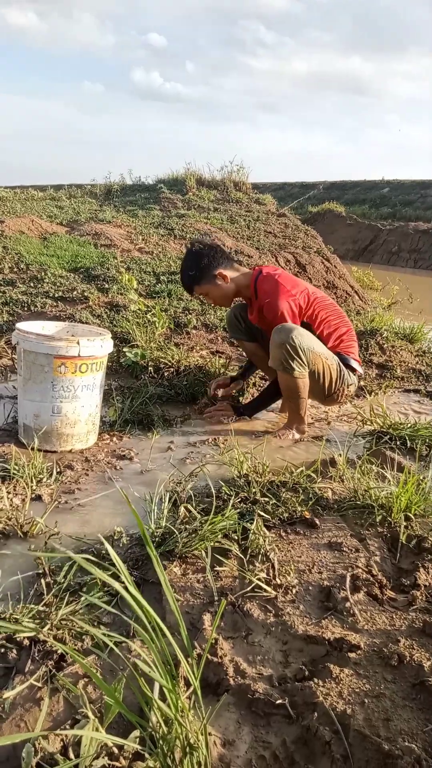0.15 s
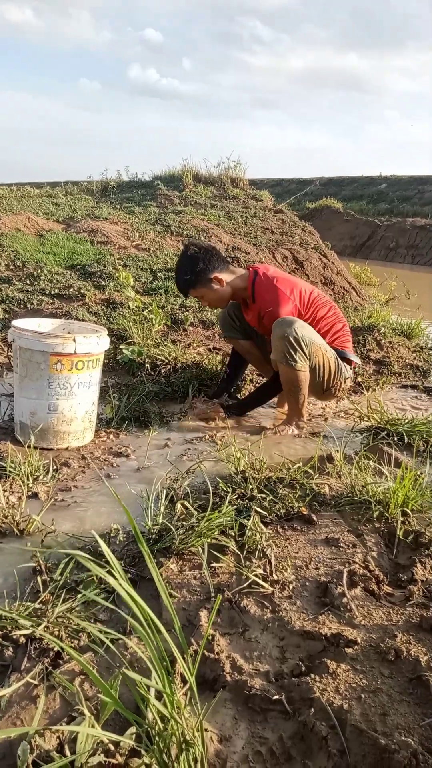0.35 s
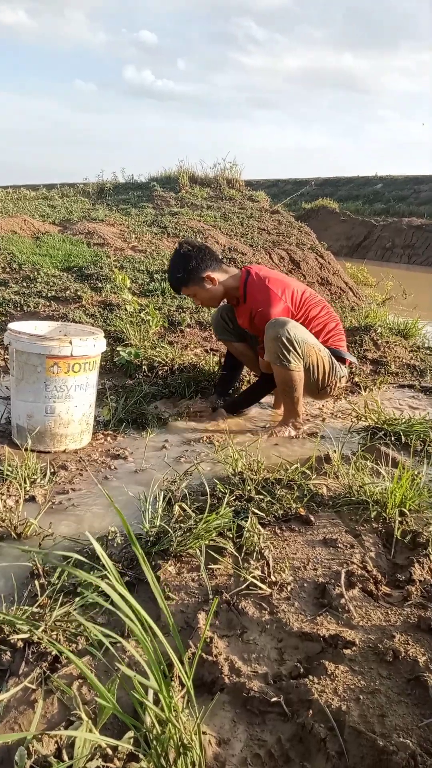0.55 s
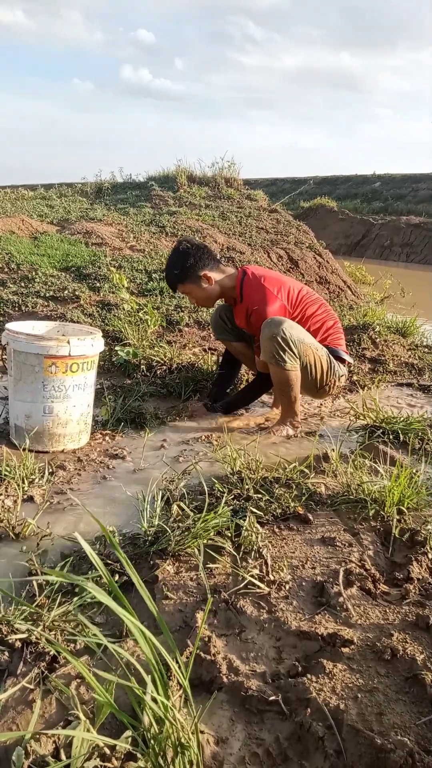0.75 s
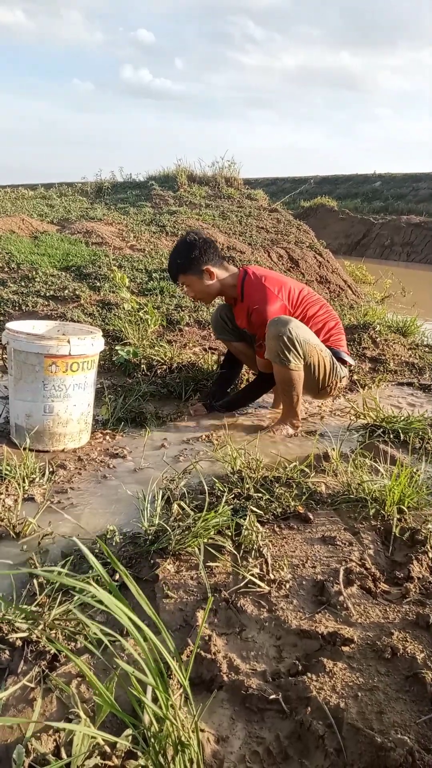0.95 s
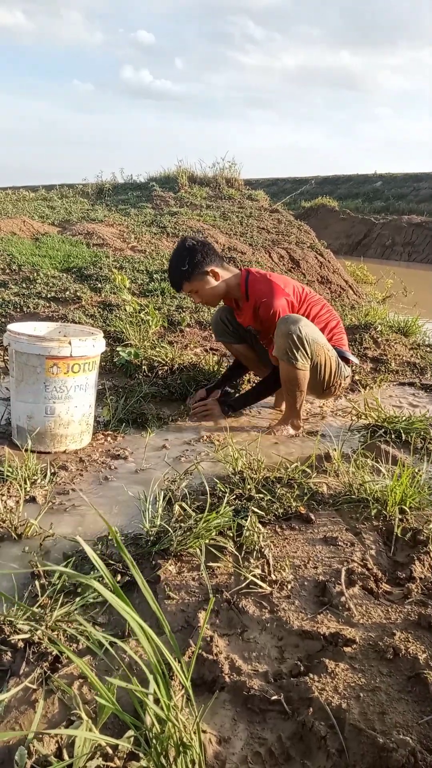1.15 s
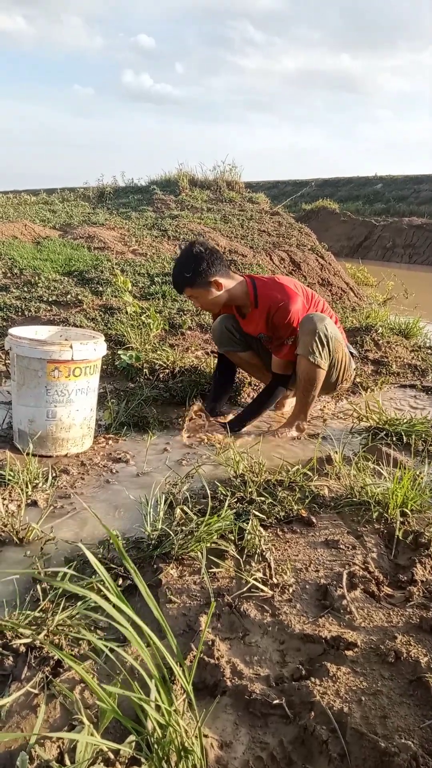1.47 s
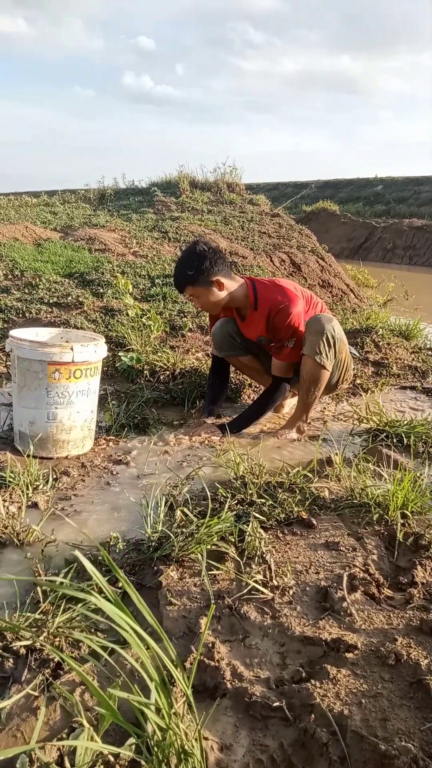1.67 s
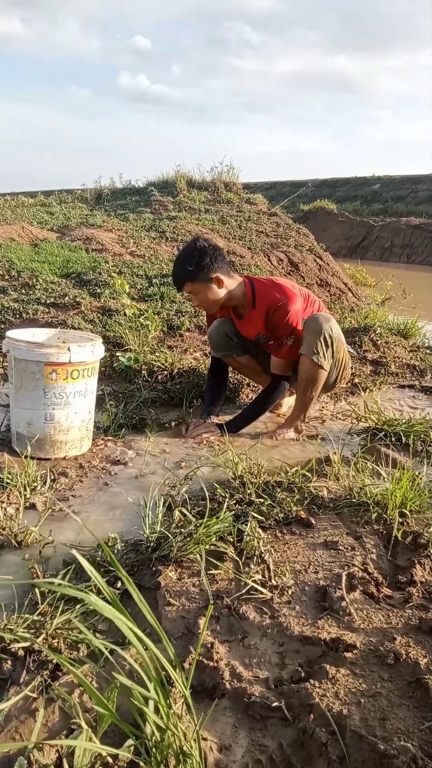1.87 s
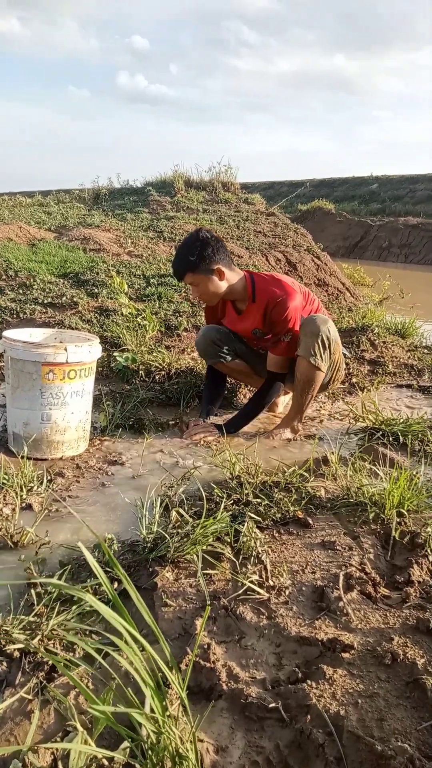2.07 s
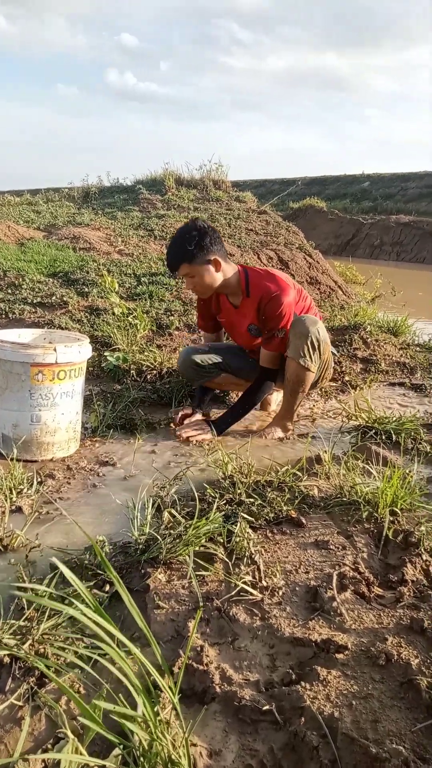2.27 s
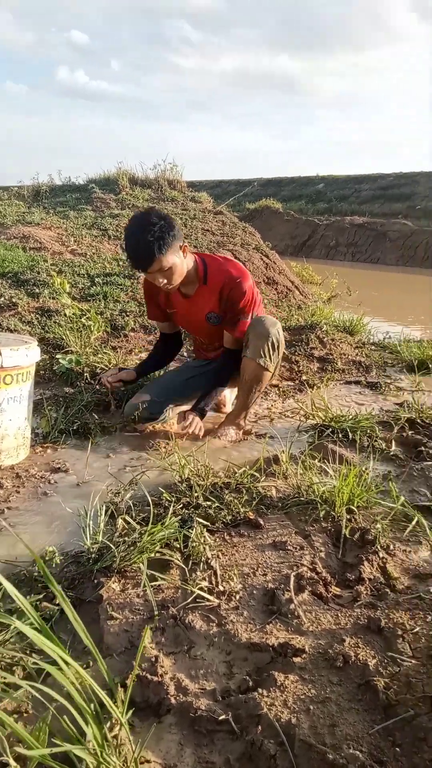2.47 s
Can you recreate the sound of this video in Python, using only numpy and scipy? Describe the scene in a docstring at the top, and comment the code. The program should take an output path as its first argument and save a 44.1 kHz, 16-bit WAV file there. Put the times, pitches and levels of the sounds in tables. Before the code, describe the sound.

Shallow water sloshes and bubbles as hands stir it outdoors, giving a few sharp drips and little splashes. A gust buffets the microphone with low, uneven thumps, builds, then fades as the water splashes again.

```python
"""In an open field, hands work through a shallow muddy puddle a few metres from a phone.
The stirred water fizzes as thousands of tiny air bubbles ring. Bigger bubbles plip one by one,
and handfuls of water splash down in short bursts of spray. A gust of wind thumps and rumbles
on the microphone opening, then dies away near the end."""
import sys
import numpy as np
from scipy import signal
from scipy.fft import rfft, irfft
from scipy.io import wavfile

SR = 44100
rng = np.random.default_rng(int(sys.argv[2]) if len(sys.argv) > 2 else 0)


def transcribe(u):
    """Save the signal u as a 16-bit wav file named by the first command-line argument.

    u: samples, shape (n,) or (channels, n), limited to [-1, 1]; the rate is SR.
    q: integer samples, one column per channel.
    """
    v = np.clip(np.atleast_2d(u).T, -1, 1)
    q = np.round(v * 32767).astype(np.int16)
    wavfile.write(sys.argv[1], SR, q)


N = 114660  # 2.6 seconds

# How hard the hands stir the water: time_s, level_db
STIR_LEVELS = [(0, -43), (.08, -47), (.15, -44.5), (.42, -44.5), (.68, -45), (.94, -44.5), (1.02, -48),
               (1.1, -43), (1.17, -49), (1.22, -44.5), (1.38, -46), (1.5, -43), (1.76, -46.5), (2.0, -47),
               (2.1, -53.5), (2.16, -50), (2.3, -52.5), (2.42, -47), (2.52, -41), (2.6, -44)]
# The tone of the fizzing water: pitch_hz, relative_db
FIZZ_TONE = [(200, -24), (450, 2.5), (800, -6), (1300, -11), (1700, -4), (2300, -6), (3100, 0),
             (3900, -5.5), (4600, -19), (6000, -24), (8000, -22), (9500, -17), (12500, -28.5),
             (15500, -29.5)]
# Single bigger bubbles: start_s, pitch_hz, level_db, ring_s (time to fade by 60 dB)
SINGLE_BUBBLES = [(.063, 832, -33, 0.034), (.133, 720, -33, 0.021), (.142, 2900, -27.5, .018),
                  (0.224, 1058, -33.5, 0.063), (0.335, 2920, -26, .025), (0.3475, 3170, -29, 0.021),
                  (0.35, 1610, -21, 0.0074), (0.3546, 3033, -1, 0.011), (0.3572, 2845, -20.5, 0.019),
                  (.416, 3140, -32, 0.03), (.436, 557, -37.5, 0.055), (0.4396, 1550, -31, 0.022),
                  (0.5565, 3030, -23, 0.012), (0.8113, 2770, -30, 0.016), (.9023, 3180, -34, 0.0096),
                  (0.9197, 2760, -21, 0.012), (.942, 3340, -34, .02), (1.084, 552, -32.5, 0.019),
                  (1.212, 3190, -34, 0.046), (1.4233, 3080, -29, 0.017), (1.462, 2300, -21, 0.0047),
                  (1.476, 4100, -33, .03), (1.483, 876, -39, 0.074), (1.646, 493, -24.5, .08),
                  (2.217, 3060, -37.5, 0.032), (2.497, 1076, -34, 0.039), (2.5083, 2210, -25.5, 0.026),
                  (2.522, 477, -34, 0.039), (2.5631, 2880, -28, 0.013), (2.565, 900, -26.5, 0.016),
                  (2.572, 523, -29, 0.012), (2.581, 2070, -27, 0.012)]
# Water slapping down: peak_s, level_db, rise_s, fade_s, treble_tilt_db_per_octave
SPLASH_HITS = [(0.099, -48, 0.0021, 0.0099, 5), (.268, -43.5, 0.011, 0.0081, 1),
               (.340, -39, .006, 0.0069, -4), (0.356, -48, .0006, 0.0018, 1),
               (0.36, -30.5, 0.006, 0.0024, 6.5), (0.527, -42, 0.005, 0.0038, 1),
               (0.558, -38, 0.00071, 0.0018, -5), (.810, -38, .001, 0.0022, -7),
               (0.841, -36.5, 0.0015, 0.0019, 20), (0.922, -40.5, .001, .008, -10),
               (1.221, -41.5, 0.0013, 0.0017, 5), (1.4408, -31.5, 0.003, 0.0041, 0.5),
               (1.4443, -17, 0.00057, 0.0016, 0.5), (1.462, -40, 0.019, 0.02, -3.5),
               (1.504, -43, 0.00089, .002, 12), (1.575, -41.5, 0.0015, 0.0028, 5),
               (1.682, -42.5, 0.0015, 0.0046, 10), (2.501, -38.5, 0.0026, 0.0036, 8),
               (2.510, -44, .001, 0.0034, 3), (2.520, -48, 0.043, 0.033, 7), (2.547, -49, .001, 0.0036, -6),
               (2.564, -37.5, .0006, 0.0044, -6.5), (2.582, -37, .001, 0.0035, -2)]
# The tone of the spray, before each splash tilts it: pitch_hz, relative_db
SPRAY_TONE = [(300, -26), (1250, -21), (2000, -3), (3200, 5.5), (5400, -2.5), (7000, -7), (9500, -8.5),
              (12000, -15.5), (15500, -21)]
# The strength of the churning air between wind thumps: time_s, level_db
GUST_LEVELS = [(0, -59.5), (.17, -45.5), (.26, -34.5), (.44, -32.5), (.472, -52), (.50, -26), (.66, -29.5),
               (.82, -29.5), (1.02, -28), (1.2, -24), (1.62, -26), (1.9, -27.5), (2.08, -23), (2.2, -41),
               (2.32, -39), (2.41, -47), (2.6, -54)]
# The tone of that churning air: pitch_hz, relative_db
GUST_TONE = [(25, -11), (40, -4.5), (70, 0), (120, -1.5), (200, -9), (280, -17), (400, -29), (600, -56.5),
             (1200, -83)]
# Swirls of air thumping the microphone: peak_s, rumble_db, half_width_s, rough_db
WIND_THUMPS = [(0.212, -21, 0.0087, -69), (0.236, -35, 0.0076, -61), (0.264, -37, .010, -67),
               (0.311, -24.5, 0.0047, -57), (0.407, -16, 0.0073, -55), (0.439, -36, 0.0051, -60),
               (.536, -18.5, 0.008, -34.5), (0.548, -13, 0.0017, -39), (.572, -25, 0.0071, -49),
               (0.629, -14.5, 0.0058, -34), (.696, -12, 0.0062, -28.5), (0.715, -14.5, 0.0086, -35),
               (.765, -24, 0.0067, -37), (0.791, -25, .008, -50), (0.843, -21.5, 0.0049, -35),
               (.872, -20.5, 0.012, -32.5), (0.9, -15, 0.0052, -32), (0.936, -26, 0.0067, -45),
               (.991, -22.5, 0.0069, -47), (1.035, -35, .010, -60), (1.071, -20.5, 0.015, -33.5),
               (1.131, -14, 0.0079, -21.5), (1.168, -18.5, 0.011, -30.5), (1.227, -13.5, 0.0075, -26.5),
               (1.252, -24, 0.014, -54), (1.354, -18.5, 0.0036, -31), (1.376, -28, 0.014, -40),
               (1.396, -21.5, 0.013, -40), (1.471, -22, .007, -66), (1.508, -20, .012, -58),
               (1.56, -17.5, 0.016, -33), (1.637, -20.5, 0.005, -49), (1.679, -21.5, 0.0098, -32),
               (1.712, -13.5, 0.0075, -20), (1.729, -13.5, 0.0056, -20.5), (1.761, -16.5, 0.005, -38),
               (1.778, -15, 0.006, -31), (1.847, -10.5, 0.015, -28.5), (1.888, -20, 0.0058, -29.5),
               (1.914, -13.5, 0.0081, -32), (1.954, -14, 0.0052, -30), (2.017, -16, 0.0097, -18.5),
               (2.043, -12, 0.0086, -15.5), (2.072, -7.5, 0.0064, -12), (2.089, -19.5, 0.011, -28),
               (2.109, -18.5, 0.0063, -19.5), (2.128, -21.5, 0.015, -36), (2.182, -25.5, 0.02, -42.5),
               (2.269, -28, 0.013, -55), (2.355, -37, 0.0056, -58), (2.459, -34.5, 0.0074, -72),
               (2.594, -42, 0.0046, -62)]
# The deep part of a thump: pitch_hz, relative_db
RUMBLE_TONE = [(25, -3), (40, -27.5), (70, -3.5), (120, 1), (200, -1.5), (280, -9), (400, -21.5),
               (600, -53.5), (1200, -87)]
# The rough, higher part of a thump: pitch_hz, relative_db
ROUGH_TONE = [(120, -40), (250, -1), (380, 1.5), (520, -5.5), (700, -17), (950, -28), (1400, -56),
              (3000, -61)]

TOP_HZ = 15450  # the phone cuts the treble above this


def undb(db):
    """Turn decibels into a number to multiply by."""
    return 10 ** (np.asarray(db) / 20)


def level_curve(rows):
    """Join (time_s, level_db) points into a smooth volume control."""
    return undb(np.interp(np.arange(N) / SR, *np.array(rows).T))


def colour(sound, tone):
    """Filter a sound by (pitch_hz, relative_db) points, then set its average (rms) level to 1."""
    hz, db = np.array(tone).T
    all_hz = np.maximum(np.fft.rfftfreq(len(sound), 1 / SR), 1)
    gains = undb(np.interp(np.log(all_hz), np.log(hz), db))
    filtered = irfft(rfft(sound) * gains, len(sound))
    return filtered / np.sqrt(np.mean(filtered ** 2) + 1e-18)


def add(out, start_s, sound):
    """Mix a sound into out, dropping whatever falls outside the scene."""
    start = int(round(start_s * SR))
    first, end = max(start, 0), min(start + len(sound), N)
    if end > first:
        out[first:end] += sound[first - start:end - start]


def burst(noise, shape):
    """Fade noise in and out along a shape, with a level of about 1 at the top."""
    shaped = noise * shape
    return shaped * np.sqrt(np.sum(shape ** 2) / np.sum(shaped ** 2))


def flutter(per_s, length):
    """A short random wobble that glides to a new value per_s times a second."""
    steps = rng.standard_normal(size=48)
    return np.interp(np.arange(length) * per_s / SR, np.arange(len(steps)), steps)


def bubble(hz, ring_s, swell_cycles=2.9, pitch_rise=0.09):
    """A bubble pinches off, rings and rises a little in pitch. Take .imag to get the sound."""
    swell_s = swell_cycles / hz
    t = np.arange(int((ring_s + swell_s) * SR)) / SR
    swell = np.sin(np.pi / 2 * np.minimum(t / swell_s, 1)) ** 2
    fade = undb(-60 * np.maximum(t - swell_s / 2, 0) / ring_s)
    cycles = hz * (t + pitch_rise * t ** 2 / (2 * ring_s))
    return swell * fade * np.exp(2j * np.pi * cycles)


def tiny_bubbles(per_s=2200, lowest_hz=350, spread_db=3.3):
    """Tiny bubbles ring at random, most faint and a few loud; smaller ones are higher and shorter."""
    out = np.zeros(N)
    pitches = np.linspace(lowest_hz, TOP_HZ, 400)
    ring_times = .0065 * np.sqrt(3000 / pitches)  # 6.5 ms at 3000 Hz
    rings = [hz ** .25 * bubble(hz, ring_s).imag for hz, ring_s in zip(pitches, ring_times)]
    for when, pick, faintness in rng.random(size=(int(per_s * N / SR), 3)):
        gain = undb(-spread_db * np.log(max(faintness, .02)))
        add(out, when * N / SR, gain * rings[int(pick * len(rings))])
    return out


def stirring():
    """Stirred water: a fizz of tiny bubbles over a soft wash, both following the hands."""
    fizz = undb(-1) * colour(tiny_bubbles(), FIZZ_TONE)
    wash = undb(-3.5) * colour(rng.standard_normal(N), FIZZ_TONE)
    return level_curve(STIR_LEVELS) * (fizz + wash)


def plips(wobble_depth=.3, wobbles_per_s=300):
    """Bigger bubbles get trapped as the hands dip and lift; mud makes their ring uneven."""
    out = np.zeros(N)
    for start_s, pitch_hz, level_db, ring_s in SINGLE_BUBBLES:
        ring = bubble(pitch_hz, ring_s)
        # The first flutter shakes the loudness, the second (times 1j) shakes the pitch.
        wobble = flutter(wobbles_per_s, len(ring)) + 1j * flutter(wobbles_per_s, len(ring))
        ease_in = np.minimum(np.arange(len(ring)) / SR * wobbles_per_s / 2, 1)
        muddy_ring = ring * (1 + wobble_depth * ease_in * wobble)
        add(out, start_s, undb(level_db) * muddy_ring.imag)
    return out


def splashes():
    """Handfuls and dribbles of water slap down in bursts of hissing spray."""
    t = np.arange(N // 4) / SR - .15  # zero at the loudest moment
    out = np.zeros(N)
    for peak_s, level_db, rise_s, fade_s, tilt in SPLASH_HITS:
        tone = [(hz, db + tilt * np.log2(hz)) for hz, db in SPRAY_TONE]
        spray = colour(rng.standard_normal(len(t)), tone)
        from_peak = np.maximum(-t / rise_s, t / fade_s)
        shape = np.exp(-np.minimum(from_peak, 20))
        add(out, peak_s + t[0], undb(level_db) * burst(spray, shape))
    return out


def wind(low_cut_hz=56, rough_rise_share=0.81):
    """Air churns at the microphone opening, and each swirl lands as a deep thump with a rough top."""
    out = level_curve(GUST_LEVELS) * colour(rng.standard_normal(N), GUST_TONE)
    t = np.arange(8192) / SR
    middle_s = t[-1] / 2
    for peak_s, rumble_db, half_width_s, rough_db in WIND_THUMPS:
        from_peak = (t - middle_s) / half_width_s
        # The rough part rises a little faster than the rumble.
        rough_from_peak = np.where(from_peak < 0, from_peak / rough_rise_share, from_peak)
        rumble = colour(rng.standard_normal(len(t)), RUMBLE_TONE)
        rough = colour(rng.standard_normal(len(t)), ROUGH_TONE)
        thump = undb(rumble_db) * burst(rumble, np.exp(-from_peak ** 2 / 2))
        thump += undb(rough_db) * burst(rough, np.exp(-rough_from_peak ** 2 / 2))
        add(out, peak_s - middle_s, thump)
    low_cut = signal.butter(2, low_cut_hz, "high", fs=SR, output="sos")
    return signal.sosfiltfilt(low_cut, out)


def scene(echo_db=-13, echo_fade_s=.007):
    """The water with a very short echo off the puddle's banks, plus wind right at the microphone."""
    t = np.arange(N // 10) / SR
    banks = rng.standard_normal(len(t)) * np.exp(-t / echo_fade_s)
    water = stirring() + plips() + splashes()
    echo = signal.fftconvolve(water, banks / np.linalg.norm(banks))[:N]
    return (water + undb(echo_db) * echo + wind())[None]  # one channel


def record(dry):
    """The phone rounds off the loudest peaks and cuts the highest treble."""
    rounded = dry / (1 + dry ** 8) ** (1 / 8)
    treble_cut = signal.ellip(10, .2, 80, TOP_HZ, fs=SR, output="sos")
    return signal.sosfilt(treble_cut, rounded)


dry = scene()
out = record(dry)
transcribe(out)
```